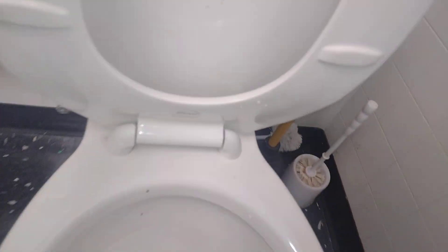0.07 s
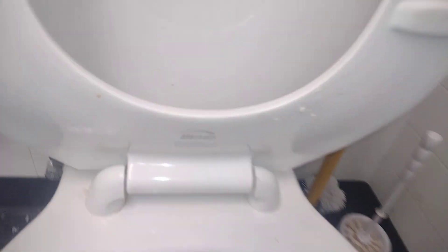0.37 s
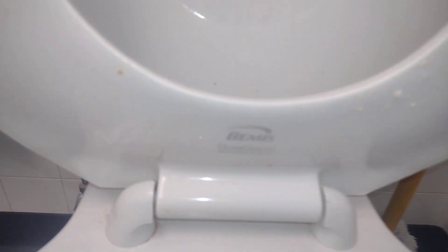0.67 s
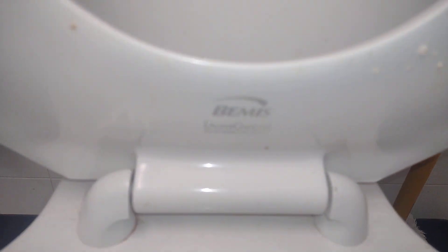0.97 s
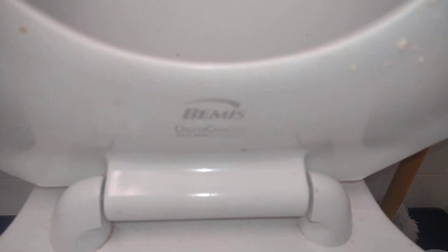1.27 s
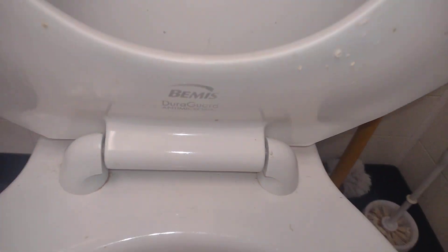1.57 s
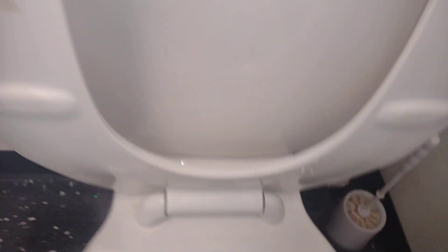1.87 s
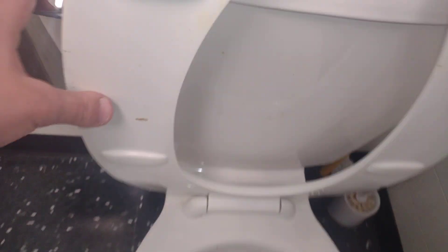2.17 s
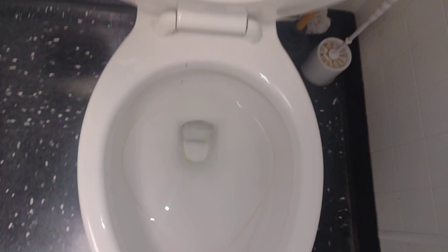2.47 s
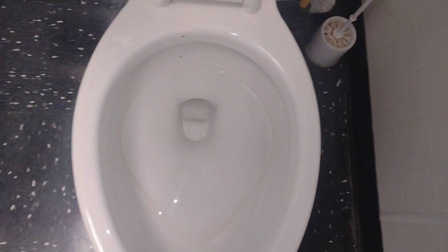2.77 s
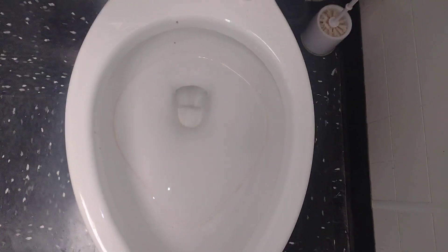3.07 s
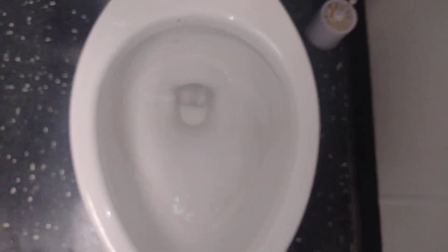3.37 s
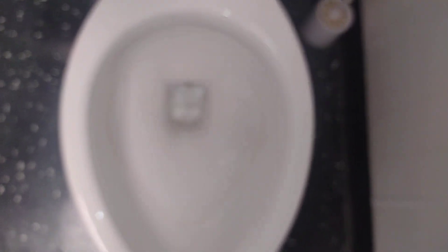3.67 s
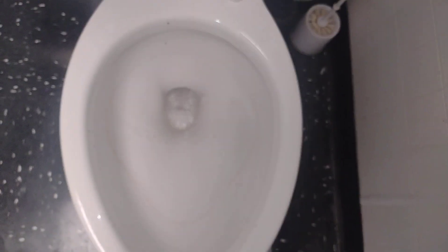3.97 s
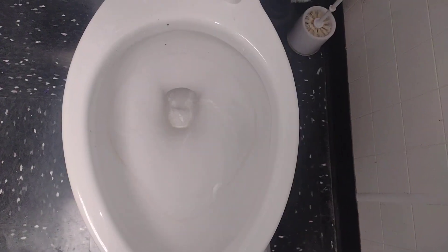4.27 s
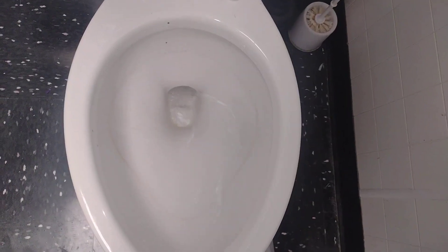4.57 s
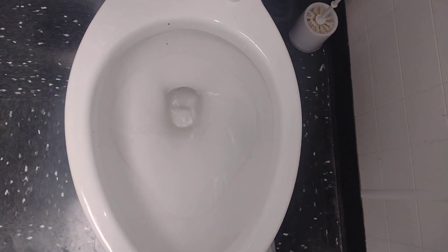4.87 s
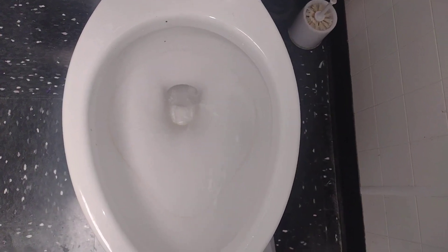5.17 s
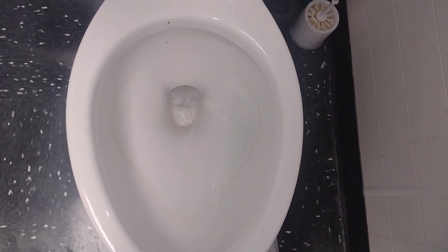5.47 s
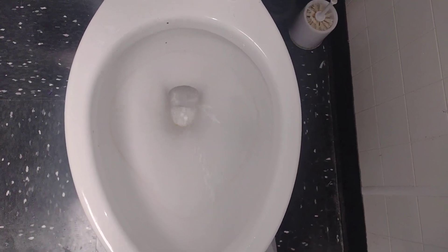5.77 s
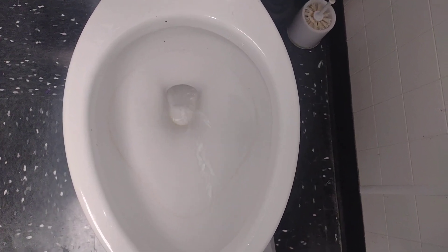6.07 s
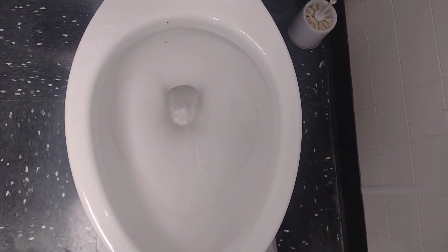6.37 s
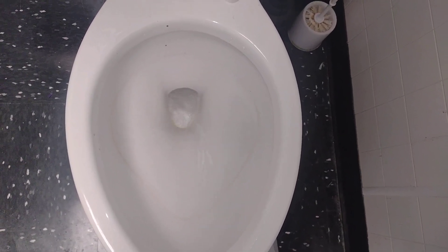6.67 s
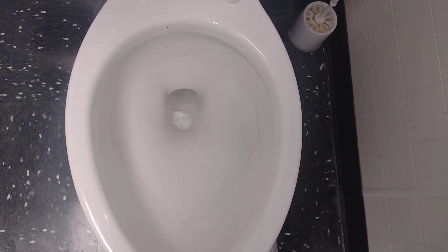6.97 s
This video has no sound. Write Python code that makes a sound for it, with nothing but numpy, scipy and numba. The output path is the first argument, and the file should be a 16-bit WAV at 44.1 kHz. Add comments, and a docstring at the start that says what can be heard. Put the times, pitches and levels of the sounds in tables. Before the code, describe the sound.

Heard close above a toilet in a tiled bathroom, faint ventilation, a few light seat knocks and a cloth rustle come first. Then a short squeak sets off a loud pressurized flush. The water roars, drains with a rising slurp, and goes on spraying, dripping and gurgling as the pool sloshes. The flow cuts off, leaving a faint trickle.

```python
"""A pressure-valve toilet flushes in a small tiled bathroom, heard from just above the bowl.
Over a ventilation rumble, the raised seat is knocked and a sleeve brushes past (0-2.6 s).
The valve squeaks, chatters and opens (2.9 s); a submerged jet roars, its bubbles ringing the bowl.
The siphon slurps and breaks (4 s) into splashing, spray and drops; the trap gulps, the pool sloshes.
The valve shuts (6.75 s) and the last water trickles off the rim."""
import sys
import numpy as np
from scipy import signal
from scipy.fft import rfft, irfft, next_fast_len
from scipy.io import wavfile
from scipy.ndimage import uniform_filter1d
from numba import njit

SR = 44100
rng = np.random.default_rng(int(sys.argv[2]) if len(sys.argv) > 2 else 0)


def int16_out(signal):
    """Quantize to a 16-bit WAV file."""
    q = np.round(np.clip(np.atleast_2d(signal).T, -1, 1) * 32767)
    wavfile.write(sys.argv[1], SR, q.astype(np.int16))


N = 309141
TIME_S = np.arange(N) / SR
FFT_SIZE = next_fast_len(N + SR // 2, True)
FREQ_HZ = np.maximum(np.arange(FFT_SIZE // 2 + 1) * SR / FFT_SIZE, 1)
SIDE_SIGN = np.array([[1], [-1]])
BOWL_LAG_S, CENTRE_LAG_S = 0.00012, 0.00003  # right channel behind left
# valve opens, air enters the rim, siphon breaks, valve throttles back, valve shuts
OPEN_S, AIR_IN_S, BREAK_S, THROTTLE_S, SHUT_S = 2.865, 3.38, 3.975, 6.07, 6.75


def flush():
    """Bubbles ring the drain and bowl; the supply surges and sputters more as air enters the stream."""
    rim_full, eased = supply_stages()
    rumble_db, roar_db, pocket_db = jet_levels(rim_full)
    splash_db, spray_db, mist_db = rim_levels(rim_full, eased)
    aeration = np.interp(TIME_S, [3.4, 4.1, 6.0], [.35, .75, 1])
    surge, sputter = aeration * walk(70), aeration * walk(150)
    water = placed(bowl_roar(surge), roar_db, pan_db=0.68)
    water += placed(air_pocket(surge), pocket_db, pan_db=1.0)
    water += placed(drain_rumble(surge), rumble_db, pan_db=-4.0)
    water += placed(splashing(surge, sputter, rim_full), splash_db, pan_db=-0.56)
    water += placed(rim_spray(surge, sputter, rim_full, eased), spray_db, pan_db=-2.35)
    water += placed(mist(surge, sputter), mist_db, pan_db=0.93)
    opened = ramp(OPEN_S - .025, 0.078) ** 2
    return rim_filling(water) * opened


def supply_stages():
    """Two shares, 0 to 1: rim running full; supply eased while the bowl drains."""
    rim_full = 1 - ramp(AIR_IN_S, 0.36)
    eased = ramp(AIR_IN_S + 0.26, 0.26) * (1 - ramp(BREAK_S, 0.012))
    return rim_full, eased


# submerged jet (time [s], level [dB])
JET_ENVELOPE = [(2.81, -27), (2.87, -29), (2.94, -15.5), (3.22, -15.5), (3.42, -19), (3.49, -22.5),
                (3.7, -24.5), (3.79, -18.5), (3.9, -22.5), (4.16, -20.5), (4.55, -31), (5.3, -37),
                (5.6, -38.5), (7.0, -46.5)]
# pool sloshing back into the trap (crest time [s], nominal length [s], roar [dB], splash [dB])
POOL_SLOSHES = [(4.43, 0.057, -35, -24), (5.077, 0.39, -29.5, -54), (5.524, 0.085, -30.5, -34),
                (5.647, 0.085, -30, -32), (5.81, 0.13, -28, -32.5), (6.061, 0.11, -31.5, -34),
                (6.204, 0.04, -33, -41), (6.367, 0.031, -30.5, -29.5), (6.493, 0.053, -34, -39)]
def jet_levels(rim_full):
    """Rumble, roar and air pocket in dB: the jet drives all three, sloshes swell the last two."""
    full_roar_db = -15
    pressure_db = 3 * rim_full
    jet_db = curves(JET_ENVELOPE)[0]
    sloshes = [undb(db) * hump(s, length_s * 0.4, length_s * 0.53)
               for s, length_s, db, _ in POOL_SLOSHES]
    roar_db = power_sum_db(undb(jet_db + walk(14)), *sloshes)
    rumble_db = -33 + 0.5 * (jet_db - full_roar_db) + 2.0 * walk(12)
    pocket_db = -25.5 + 0.49 * (roar_db - full_roar_db)
    return rumble_db + pressure_db, roar_db, pocket_db + pressure_db


# supply at the rim, heard as spray (time [s], level [dB])
SUPPLY_ENVELOPE = [(2.85, -52), (2.882, -33.5), (2.99, -26.5), (3.06, -28.5), (3.2, -24), (3.4, -26),
                   (3.68, -30), (3.82, -25), (3.96, -29), (3.99, -23), (4.6, -24), (6.03, -28),
                   (6.11, -31.5), (6.27, -28), (6.53, -35), (6.65, -32.5), (6.68, -34), (6.73, -31.5),
                   (6.77, -51.5), (7.0, -61)]
def rim_levels(rim_full, eased):
    """Splash, spray and mist in dB: splashing leaps as the bowl empties and fades as it refills."""
    supply_db = curves(SUPPLY_ENVELOPE)[0]
    refill_s = np.maximum(TIME_S - BREAK_S, 0)
    splash_sag_db_per_s, mist_sag_db_per_s = 3.5, 1
    pour_db = -30 + 7 * ramp(BREAK_S - .06, 0.33) + 1.4 * rim_full * (supply_db + 26)
    pour_db -= splash_sag_db_per_s * refill_s + 4.5 * ramp(SHUT_S + 0.044, 0.1)
    slam = undb(-23) * hump(OPEN_S + 0.025, rise_s=0.025, fall_s=0.057)
    sloshes = [undb(db) * hump(s, length_s * 0.65, length_s * 0.22)
               for s, length_s, _, db in POOL_SLOSHES]
    splash_db = power_sum_db(undb(pour_db + 0.81 * walk(16)), slam, *sloshes)
    spray_db = supply_db + 0.4 * walk(20)
    thinning_db = 11 * eased + (1 - eased) * (6 + mist_sag_db_per_s * refill_s)
    return splash_db, spray_db, spray_db - (1 - rim_full) * thinning_db


# full bowl and trap (frequency [Hz], width [Hz], level [dB])
FULL_BOWL_MODES = [(218, 11.7, 1), (270.2, 6.9, 7), (300, 17, 0), (327, 9, 0.5), (363.4, 10.6, 0.5),
                   (403, 27, -0.5), (432, 33, -6.5), (514, 43, -8)]
def bowl_roar(surge):
    """The jet's bubbles ring the full bowl."""
    swarm = bubbles(162, 654, cycles=14.8, spread_db=0.62, count=5000)
    return stream(swarm, cavity(FULL_BOWL_MODES, 190, 522), 0.2 * surge, wet_db=-5.5, width=0.75)


# air pocket (frequency [Hz], width [Hz], level [dB])
POCKET_MODES = [(634, 114, 10.5), (697, 24, 15), (693, 19, 6), (853, 6.5, 4.5), (937, 10, 11),
                (930, 13, 6.5)]
def air_pocket(surge):
    """Bubbles ring the air held at the trap mouth."""
    swarm = bubbles(517, 1140, cycles=21, spread_db=1.8, count=3000)
    return stream(swarm, cavity(POCKET_MODES, 310, 870), 1.3 * surge, wet_db=-4.5, width=0.64)


# drain (frequency [Hz], width [Hz], level [dB])
DRAIN_MODES = [(80.6, 8.3, -2), (115, 46, -14.5), (157, 70, -7)]
def drain_rumble(surge):
    """The largest bubbles ring the drain."""
    swarm = bubbles(42.3, 186, cycles=9.6, spread_db=3.6, count=2000)
    return stream(swarm, cavity(DRAIN_MODES, 67, 260), surge, wet_db=4.1, width=0.17)


# open bowl (frequency [Hz], width [Hz], level [dB])
OPEN_BOWL_MODES = [(913, 140, 4), (1020, 140, -0.5), (1193, 25, 0), (1285, 87, 3), (1429, 29, 3),
                   (1544, 33, 0.5), (1736, 140, -2.5), (2006, 154, 0), (2443, 143, 2.5), (2705, 110, -2.5),
                   (2940, 250, 1.5)]
def splashing(surge, sputter, rim_full):
    """Small bubbles ring the open bowl; once the valve shuts, the pool only laps."""
    swarm = bubbles(936, 3485, cycles=30.4, spread_db=3.3, count=6000)
    flutter_db = 1.3 * surge + 1.5 * sputter
    splash = stream(swarm, cavity(OPEN_BOWL_MODES, 870, 6800), flutter_db, wet_db=0.5, width=0.8)
    splash = blend_eq(splash, rim_full, [(2500, -0.5), (2950, -4.5), (3600, 10.5)])
    splash = blend_eq(splash, ramp(SHUT_S, 0.068), [(2400, 0), (3200, -6), (5000, -9)])
    return shimmer(splash, depth_db=1.6)


# spray colour (frequency [Hz], gain [dB])
SPRAY_EQ = [(1500, -60), (2600, -15), (3300, 4.5), (3800, 2.5), (5000, 0.5), (6300, 1.5), (7400, 0.5),
            (8300, 0), (9500, -4), (12000, -21)]
# rim channel (frequency [Hz], width [Hz], level [dB])
RIM_MODES = [(3450, 190, 1), (3660, 760, 2), (3960, 130, 4), (4260, 190, 6), (4550, 223, 3.5),
             (4720, 150, 4), (5090, 350, 7), (5610, 200, 8.5), (5950, 140, 7), (6500, 250, 5.5),
             (6890, 240, 6), (7400, 250, 7), (7270, 200, 2), (7890, 240, 2.5), (8260, 160, 6)]
# supply pipe at full pressure (frequency [Hz], width [Hz], level [dB])
PIPE_MODES = [(4030, 650, 5), (4370, 410, 9), (5350, 260, 9.5), (6240, 520, 10.5), (7300, 600, 8.5),
              (7900, 230, 12), (9850, 140, 13)]
def rim_spray(surge, sputter, rim_full, eased):
    """Pipe hiss gives way to spray, duller on a weak supply and hollow while the water is lowest."""
    swarm = bubbles(2780, 9330, cycles=17, spread_db=4.2, count=20000)
    colour = slope(SPRAY_EQ) * cavity(RIM_MODES, 2500, 11000)
    spray = stream(swarm, colour, surge + 3.0 * sputter, wet_db=1.0, width=0.86)
    hiss = unit(filtered(rng.standard_normal((2, N)), cavity(PIPE_MODES, 3300, 12300))) * undb(walk(90))
    spray = np.sqrt(rim_full) * hiss + np.sqrt(1 - rim_full) * unit(spray)
    dull = eased + 0.75 * ramp(THROTTLE_S, 0.053)
    spray = blend_eq(spray, dull, [(4000, 1.5), (6000, -3.0), (8000, -8.5)])
    hollow = hump(4.85, rise_s=0.39, fall_s=0.15)
    spray = blend_eq(spray, hollow, [(3000, 11), (3400, -5), (3750, -4), (4400, -0.5), (5000, -0.5)])
    return shimmer(spray, depth_db=1.8)


# mist colour (frequency [Hz], gain [dB])
MIST_EQ = [(4000, -60), (7500, -19), (8800, 10), (10000, 8), (11000, 8), (12300, 8), (14000, 4.5),
           (16000, -3)]
def mist(surge, sputter):
    """The finest bubbles fizz above the spray."""
    swarm = bubbles(7100, 15400, cycles=4.3, spread_db=8.0, count=30000)
    fizz = stream(swarm, slope(MIST_EQ), 0.65 * surge + 2.4 * sputter, wet_db=3.0, width=0.91)
    return shimmer(fizz, depth_db=2.1)


def rim_filling(x):
    """A notch glides up through the first rush and closes as water fills the rim."""
    deepest_s, centre_hz, climb_hz_per_s, width_hz = 3.02, 3150, 3900, 320
    hz, s, frames = signal.stft(x, SR, nperseg=512)
    depth_db = -7 * np.interp(s, TIME_S, hump(deepest_s, 0.08, 0.11))
    offset = (hz[:, None] - centre_hz - climb_hz_per_s * (s - deepest_s)) / width_hz
    return signal.istft(frames * undb(depth_db * np.exp(-offset ** 2)))[1][..., :N]


# siphon drawing air (time [s], pitch [Hz], level [dB])
SIPHON_GLIDE = [(3.70, 229.8, -32), (3.76, 255.8, -18), (3.81, 383.6, -17), (3.89, 385.4, -17.5),
                (3.92, 539.4, -24), (3.965, 682.4, -16.5), (4.0, 1020, -19.5), (4.05, 1245, -20.5),
                (4.12, 1372, -32)]
def siphon():
    """A shrinking air cavity in the trap, shaken at random: a rising slurp that frays into a splash."""
    hz, db = curves(SIPHON_GLIDE)
    fray = np.clip(hz / 1000, 0, 1) ** 2
    shake = [(1 - fray) * walk(230) + fray * walk(1200) for _ in range(2)]
    phase = 2 * np.pi * np.cumsum(hz) / SR
    slurp = steady(shake[0] * np.sin(phase) + shake[1] * np.cos(phase))
    sucking = (TIME_S > SIPHON_GLIDE[0][0]) & (TIME_S < SIPHON_GLIDE[-1][0])
    return bathroom(in_bowl(slurp * undb(db) * sucking, ring_db=-5), wet_db=-7, t60_s=0.23)


# gulps of air (time [s], level [dB], pitch [Hz], rise [cycles], slap re level [dB])
TRAP_GULPS = [(2.861, -19, 430, 1.2, -7), (2.913, -18, 330, 1, -7), (3.968, -17, 670, 1, -7),
              (4.423, -19, 800, 0.8, -3), (4.4435, -14.5, 720, 0.6, -4), (4.462, -19, 1000, 2, -4),
              (4.599, -20, 750, 1.2, -7), (4.922, -17, 1330, 1.5, -6), (5.468, -23, 676, 1, -6),
              (5.526, -20, 1200, 1.5, -7), (5.626, -22, 320, 0.8, -5), (5.648, -22, 315, 0.7, -4),
              (5.736, -16, 790, 1, -5), (5.772, -25, 290, 1, -6), (5.79, -17, 1050, 1.2, -3),
              (5.8, -24, 330, 1, -5), (5.811, -17.5, 1130, 2, -7), (5.829, -21, 1400, 2, -7),
              (5.835, -27, 340, 0.8, -5), (5.912, -17.5, 1140, 1.6, -8), (5.94, -25, 300, 0.7, -6),
              (6.0565, -9.5, 620, 0.7, -10), (6.074, -22, 1200, 2, -6), (6.17, -15, 600, 0.6, -3),
              (6.211, -26, 680, 1, -4), (6.361, -24, 976, 2, -7), (6.434, -24, 1030, 2.5, -8),
              (6.482, -21, 1250, 2, -8), (6.657, -24, 1210, 1.5, -6), (6.753, -16.5, 1230, 1.1, -6),
              (6.94, -28, 1100, 2.5, -8)]
def gulps():
    """Large air pockets collapse in the trap: a few ragged cycles and a wet slap each."""
    out, t = np.zeros(N), TIME_S[:SR // 10]
    for s, db, hz, cycles, slap_db in TRAP_GULPS:
        age = t * hz / cycles
        ragged = 1 + .16 * walk(hz)[:len(t)]
        envelope = np.sqrt(age) * np.exp((1 - age) / 2)
        tone = envelope * np.sin(2 * np.pi * hz * np.cumsum(ragged) / SR)
        band = signal.butter(1, [hz * .3, hz * 3.2], "band", fs=SR, output="sos")
        slap = unit(signal.sosfilt(np.vstack([band, band]), rng.standard_normal(len(t))))
        add(out, s, undb(db) * (tone + undb(slap_db) * np.exp(-t * hz / 2) * slap))
    return bathroom(in_bowl(out, ring_db=-7), wet_db=-9, t60_s=.18)


# loudest drops into the pool (time [s], level [dB], pitch [Hz], ring [cycles])
POOL_DROPS = [(3.641, -15, 5060, 100), (3.813, -15, 5340, 100), (4.212, -1, 4930, 80),
              (4.248, -20, 2360, 80), (4.399, -15, 2870, 70), (4.827, -19, 2820, 70),
              (4.857, -10.5, 2790, 90), (4.877, -18, 2400, 90), (5.091, -16, 2840, 80),
              (5.178, -14, 1410, 40), (5.287, -17, 1370, 40), (5.458, -23, 2460, 140),
              (5.514, -17, 8000, 160), (5.6, -17, 4060, 90), (5.653, -22, 2750, 100),
              (5.679, -15, 5400, 100), (5.749, -16, 7150, 160), (5.87, -19, 2870, 80),
              (6.036, -15, 5600, 90), (6.127, -23, 2840, 70), (6.212, -23, 1550, 50),
              (6.363, -21, 4070, 100), (6.378, -24, 2900, 70), (6.462, -21, 2470, 130),
              (6.578, -23, 5700, 160), (6.637, -22, 2870, 100), (6.704, -22, 6560, 140),
              (6.896, -33, 2370, 80)]
def drops():
    """Each drop traps a bubble that plinks; the patter follows the splash, the finest the spray."""
    s, db, hz, cycles = np.transpose(POOL_DROPS).copy()
    splash_db, spray_db, _ = rim_levels(*supply_stages())
    plinks = ring(s, hz, cycles, undb(db), glide=.06)
    patter = unit(bubbles(950, 3000, cycles=45, spread_db=2.2, count=600)) * undb(splash_db - 12.5)
    fine = unit(bubbles(3900, 8400, cycles=100, spread_db=2.2, count=600)) * undb(spray_db - 12.5)
    falling = ramp(BREAK_S - .17, 0.28) - 0.5 * ramp(SHUT_S, .05)
    return bathroom(plinks + (patter + fine) * falling, wet_db=-5, t60_s=.09, lag_s=CENTRE_LAG_S)


# spits of spray (time [s], peak [dB], low edge [Hz], high edge [Hz], decay [s])
RIM_SPITS = [(3.982, -5, 3000, 7000, 0.004), (4.04, -9, 8500, 12000, 0.002), (4.184, -4, 4200, 7000, 0.005),
             (4.196, -6, 5000, 8200, 0.002), (4.3635, -0.5, 7000, 15000, 0.0018),
             (4.395, -9, 4800, 6500, 0.004), (4.774, -8, 4500, 8200, 0.004),
             (5.122, -13, 6000, 10000, 0.003), (5.404, -6, 5500, 8000, 0.003),
             (5.73, -10.5, 4000, 8000, 0.003), (5.869, -15, 1700, 3800, 0.009),
             (5.993, -12, 3000, 9500, 0.003), (6.0, -10, 4000, 10000, 0.004),
             (6.046, -13, 3000, 6500, 0.002), (6.357, -18, 2300, 4800, 0.009),
             (6.677, -15, 3500, 10000, 0.004)]
def spits():
    """Trapped air bursts out of the rim holes in short bright cracks."""
    out, t = np.zeros(N), TIME_S[:SR // 20]
    for s, db, low_hz, high_hz, decay_s in RIM_SPITS:
        band = signal.butter(2, [low_hz, high_hz], "band", fs=SR, output="sos")
        crack = signal.sosfilt(band, rng.standard_normal(len(t))) * np.exp(-t / decay_s)
        add(out, s, undb(db) * crack / abs(crack).max())
    return bathroom(out, wet_db=-6, t60_s=0.1, lag_s=CENTRE_LAG_S)


# last trickles (time [s], level [dB], fall [s])
RIM_TRICKLES = [(6.77, -40, 0.01), (6.824, -41, 0.016), (6.862, -51, 0.008), (6.942, -38.5, 0.028),
                (6.992, -44, 0.015)]
# trickle colour (frequency [Hz], gain [dB])
TRICKLE_EQ = [(4200, 3), (5200, -12), (9000, -11.5)]
def trickle():
    """With the valve shut, the last water runs off the rim in separate small splashes."""
    swarm = steady(bubbles(2370, 10000, cycles=23, spread_db=5.6, count=9000))
    droplets = unit(filtered(swarm, slope(TRICKLE_EQ)))
    runs = sum(undb(db) * hump(s, 0.0034, fall_s) for s, db, fall_s in RIM_TRICKLES)
    return bathroom(droplets * runs, wet_db=7, t60_s=0.097)


# stick-slip tones (time [s], length [s], start pitch [Hz], end pitch [Hz], level [dB])
VALVE_SQUEAKS = [(2.757, 0.018, 1378, 1334, -18), (2.77, 0.015, 1340, 1350, -18),
                 (2.762, 0.045, 1004, 900, -35.5), (2.778, 0.013, 1320, 1310, -29),
                 (2.793, 0.031, 1338, 1320, -30), (2.88, 0.0073, 2560, 2470, -3),
                 (2.881, 0.029, 1172, 1190, -10.5), (2.878, 0.03, 546, 536, -16),
                 (2.89, 0.022, 2300, 2460, -15)]
def valve():
    """The handle squeaks and scrapes the valve body, then the seal chatters as it lifts."""
    tones, rubbing = np.zeros(N), np.zeros(N)
    for s, length_s, start_hz, end_hz, db in VALVE_SQUEAKS:
        progress = np.linspace(0, 1, int(length_s * SR))
        jitter = 1 + 0.013 * walk(600)[:len(progress)]
        hz = (start_hz + (end_hz - start_hz) * progress) * jitter
        phase = 2 * np.pi * np.cumsum(hz) / SR
        tone = np.sin(phase) + undb(-41) * (np.sin(2 * phase) + np.sin(3 * phase))
        rasp = 1 + .08 * walk(900)[:len(progress)]
        force = undb(db) * abs(np.sin(np.pi * progress)) * rasp
        add(tones, s, force * tone)
        add(rubbing, s, force)
    body_modes = [(2450, 220, -1), (2730, 90, 1), (3780, 120, -4), (4000, 110, 4), (5300, 400, -10)]
    scrape = rubbing * unit(filtered(rng.standard_normal(N), cavity(body_modes, 2200, 7000)))
    return bathroom(tones + undb(-27.5) * scrape, wet_db=-6, t60_s=.17)


# seat and hinge knocks (time [s], peak [dB], high edge [Hz], rattle decay [s], relative ring [dB])
SEAT_KNOCKS = [(0.193, -47, 625, 0.017, -35), (0.48, -44, 7000, 0.0046, -21),
               (0.822, -55, 1500, 0.0065, -25), (1.873, -36, 4200, 0.015, 5), (1.907, -43, 3500, 0.008, 9),
               (1.919, -39, 805, 0.02, -5), (2.039, -54, 610, 0.035, 0), (2.06, -35.5, 2200, 0.021, -15),
               (2.068, -33, 4160, 0.0093, -8), (2.094, -37, 1300, 0.019, -7.5)]
# plastic seat (frequency [Hz], level [dB], t60 [s])
SEAT_MODES = [(226, -12, 0.068), (475, 3.5, 0.15), (628, -1, 0.083), (950, 2, 0.094), (1185, 0, 0.065),
              (2265, 9, 0.05), (2350, -3, 0.06), (2623, 6.5, 0.19), (3470, -10, .14), (3700, -6, 0.092),
              (3850, -4, 0.074), (6137, -14, .12)]
def seat():
    """Each knock is a clack and a short rattle in the hinge; its first push rings the seat."""
    clacks, drive, t = np.zeros(N), np.zeros(N), TIME_S[:SR // 3]
    for s, db, high_hz, rattle_s, ring_db in SEAT_KNOCKS:
        band = signal.butter(2, [170, high_hz], "band", fs=SR, output="sos")
        contact = signal.sosfilt(band, rng.standard_normal(len(t)) * np.exp(-t / rattle_s))
        contact = undb(db) * contact / abs(contact).max()
        push = signal.sosfilt(band, signal.unit_impulse(len(t)))
        add(clacks, s, contact)
        add(drive, s, undb(ring_db) * unit(push) * contact.std())
    body = sum((-1) ** k * undb(db - 60 * t / t60_s) * np.sin(2 * np.pi * hz * t)
               for k, (hz, db, t60_s) in enumerate(SEAT_MODES))
    ringing = filtered(drive, rfft(body / np.sqrt(np.sum(body ** 2)), FFT_SIZE))
    return bathroom(clacks + ringing, wet_db=-1.3, t60_s=0.24)


# cloth colour (frequency [Hz], gain [dB])
SLEEVE_EQ = [(180, -50), (300, -16), (470, -5.5), (737, -9.5), (915, -5), (1120, -9.5), (1930, -10.5),
             (3640, -10), (7820, -13), (10900, -15.5), (16000, -23)]
# arm strokes (crest time [s], rise [s], fall [s], level [dB])
SLEEVE_STROKES = [(0.15, .2, 0.2, -67.5), (0.6, 0.34, 0.39, -68.5), (1.76, 0.29, 0.63, -68),
                  (2.58, 0.18, 0.17, -52.5)]
def sleeve():
    """Soft friction of cloth, swelling and fading with each stroke of the arm."""
    rub = unit(filtered(rng.standard_normal((2, N)), slope(SLEEVE_EQ)))
    strokes = sum(undb(db) * hump(s, rise_s, fall_s) for s, rise_s, fall_s, db in SLEEVE_STROKES)
    return rub * strokes * undb(walk(25.8))


# room tone colour (frequency [Hz], gain [dB])
ROOM_EQ = [(25, -23), (48, -31), (64, -10), (105, -4.5), (127, -8.5), (185, -23), (260, -22), (384, -31),
           (520, -32), (1700, -45), (9000, -48), (14500, -45), (16000, -57)]
def room_tone():
    """A low, nearly mono ventilation rumble under faint hiss."""
    mid, side = filtered(rng.standard_normal((2, N)), slope(ROOM_EQ))
    side = filtered(side, np.clip(FREQ_HZ / 1200, .15, 1))
    return placed(mid + SIDE_SIGN * side, -62.5 + walk(5.9), pan_db=-2.5)


def bubbles(low_hz, high_hz, cycles, spread_db, count):
    """A swarm of bubbles, many faint and a few loud, each starting inwards or outwards."""
    when, pitch, luck, sign = rng.random((count, 4)).T
    hz = low_hz * (high_hz / low_hz) ** pitch
    gain = undb(spread_db * np.minimum(-np.log(1 - luck), 4)) * hz * np.sign(sign - .5)
    return ring(when * N / SR, hz, np.full(count, float(cycles)), gain, glide=.2)


@njit
def ring(start_s, hz, cycles, gain, glide):
    """Bubbles: sines that die by 60 dB in so many cycles while their pitch rises."""
    out = np.zeros(N)
    for k in range(len(start_s)):
        first, length, phase = int(start_s[k] * SR), cycles[k] * SR / hz[k], 0.
        for i in range(min(int(length), N - first)):
            phase += 2 * np.pi * hz[k] / SR * (1 + glide * i / length)
            out[first + i] += gain[k] * np.exp(-6.9 * i / length) * np.sin(phase)
    return out


def stream(swarm, colour, flutter_db, wet_db, width, t60_s=0.27):
    """Moving water: the swarm itself, plus a diffuse wash from the tiles that follows its power."""
    direct = steady(filtered(swarm, colour) * undb(flutter_db))
    pole = np.exp(-np.log(1e6) / (t60_s * SR))
    swell = np.sqrt(signal.lfilter([1 - pole], [1, -pole], direct ** 2) + 1e-18)
    mid, side = (steady(noise) for noise in filtered(rng.standard_normal((2, N)), colour))
    wash = swell * (mid + SIDE_SIGN * width * side) / np.sqrt(1 + width ** 2)
    lagged = filtered(direct, np.exp(-2j * np.pi * FREQ_HZ * BOWL_LAG_S))
    return np.array([direct, lagged]) + undb(wet_db) * wash


def shimmer(x, depth_db):
    """The churning surface shifts the resonances: each narrow band swells and sinks on its own."""
    frames = signal.stft(x, nperseg=512)[2]
    swell = rng.standard_normal(frames.shape[-2:])
    swell = uniform_filter1d(uniform_filter1d(swell, size=3, axis=0), size=6, axis=1)
    return signal.istft(frames * undb(depth_db * unit(swell)))[1][..., :N]


def in_bowl(x, ring_db):
    """A sound made in the trap loses its bass and rings the bowl and the air pocket."""
    lean = signal.sosfilt(signal.butter(4, 203, "high", fs=SR, output="sos"), x)
    ringing = np.zeros(N)
    for modes, trim_db in (FULL_BOWL_MODES, 0), (POCKET_MODES, -12.5):
        for hz, width_hz, db in modes:
            ringing += undb(db + trim_db) * signal.lfilter(*signal.iirpeak(hz, hz / width_hz, SR), lean)
    return (lean + undb(ring_db) * ringing) / np.sqrt(1 + undb(ring_db) ** 2)


def bathroom(x, wet_db, t60_s, lag_s=BOWL_LAG_S):
    """Direct sound plus dense tile reflections, which widen above the bass."""
    t = TIME_S[:SR // 2]
    tails = rng.standard_normal((2, len(t))) * undb(-60 * t / t60_s) * (t > .002)
    mid, side = (tail / np.sqrt(np.mean(abs(tail) ** 2)) for tail in rfft(tails, FFT_SIZE))
    width = np.minimum(FREQ_HZ / 1100, 1)
    tiles = (mid + SIDE_SIGN * width * side) / np.sqrt(1 + width ** 2)
    direct = np.exp(-2j * np.pi * FREQ_HZ * lag_s * np.array([[0], [1]]))
    wet = undb(wet_db)
    return filtered(x, (direct + wet * tiles) / np.sqrt(1 + wet ** 2))


def cavity(modes, low_hz, high_hz):
    """Response of modes (frequency [Hz], width [Hz], level [dB]), falling steeply outside a band."""
    power = sum(undb(db) ** 2 / (1 + ((FREQ_HZ ** 2 - hz ** 2) / (FREQ_HZ * width_hz)) ** 2)
                for hz, width_hz, db in modes)
    return np.sqrt(power / (1 + (low_hz / FREQ_HZ) ** 8) / (1 + (FREQ_HZ / high_hz) ** 16))


def slope(points):
    """Response through points (frequency [Hz], gain [dB])."""
    hz, db = np.transpose(points)
    return undb(np.interp(np.log(FREQ_HZ), np.log(hz), db))


def filtered(x, response):
    """Apply a frequency response."""
    return irfft(rfft(x, FFT_SIZE) * response, FFT_SIZE)[..., :N]


def blend_eq(x, share, points):
    """Crossfade to a copy shaped by points (frequency [Hz], gain [dB])."""
    return share * filtered(x, slope(points)) + (1 - share) * x


def walk(rate_hz):
    """Random levels held 1 / rate_hz s and slewed twice; spread near 1."""
    hold = max(int(SR / rate_hz), 40)
    steps = np.repeat(rng.standard_normal(8192)[:N // hold + 1], hold)
    return 1.3 * uniform_filter1d(uniform_filter1d(steps, hold), hold)[:N]


def curves(table):
    """Table columns, linearly interpolated in time."""
    s, *columns = np.transpose(table)
    return [np.interp(TIME_S, s, column) for column in columns]


def ramp(centre_s, length_s):
    """Linear rise from 0 to 1."""
    return np.clip((TIME_S - centre_s) / length_s + .5, 0, 1)


def hump(crest_s, rise_s, fall_s):
    """Smooth swell, peak 1."""
    return np.exp(-((TIME_S - crest_s) / np.where(TIME_S < crest_s, rise_s, fall_s)) ** 2)


def steady(x):
    """Even out slow swell, keep quick flutter."""
    return x / np.sqrt(uniform_filter1d(uniform_filter1d(x ** 2, size=4000), size=4000) + 1e-18)


def placed(x, db, pan_db):
    """Set level and left-over-right balance."""
    return x / np.sqrt(np.mean(x.mean(0) ** 2)) * undb(db + SIDE_SIGN * pan_db / 2)


def add(track, start_s, sound):
    """Mix a sound in."""
    start = int(start_s * SR)
    part = sound[:max(N - start, 0)]
    track[start:start + len(part)] += part


def power_sum_db(*gains):
    """Level of unrelated sounds heard at once."""
    return 10 * np.log10(sum(gain ** 2 for gain in gains) + 1e-18)


def undb(db):
    """Decibels to gain."""
    return 10 ** (np.asarray(db) / 20)


def unit(x):
    """Scale to rms 1."""
    return x / np.sqrt(np.mean(x ** 2) + 1e-18)


def scene():
    """Everything in the bathroom."""
    water = flush() + siphon() + gulps() + drops() + spits() + trickle()
    return water + valve() + seat() + sleeve() + room_tone()


def record(dry):
    """High-pass at 30 Hz, soft peak limit, low-pass at 15.9 kHz."""
    lean = signal.sosfilt(signal.butter(2, 30, "high", fs=SR, output="sos"), dry)
    rounded = lean / (1 + (lean / .9) ** 6) ** (1 / 6)
    return signal.sosfilt(signal.ellip(10, .2, 80, 15900, fs=SR, output="sos"), rounded)


dry = scene()
out = record(dry)
int16_out(out)
```